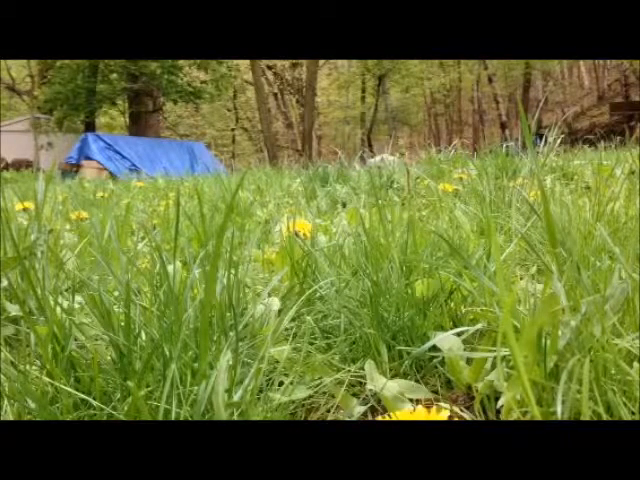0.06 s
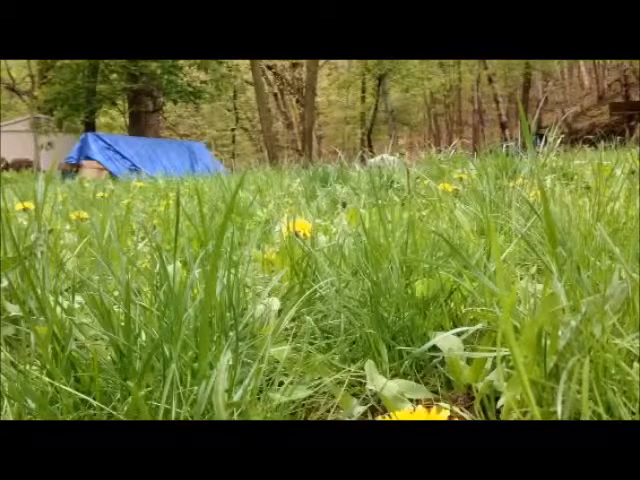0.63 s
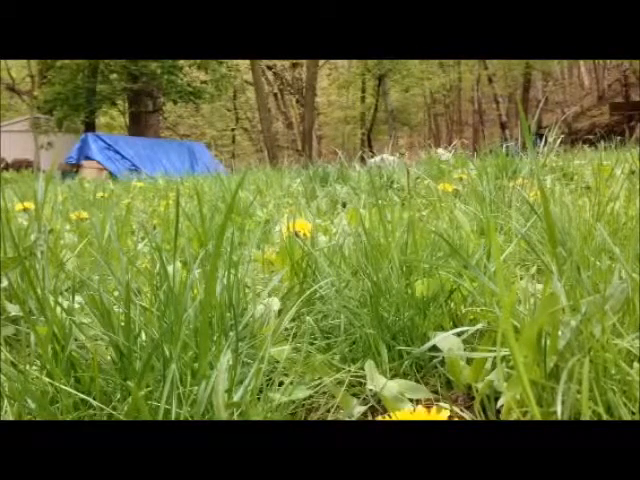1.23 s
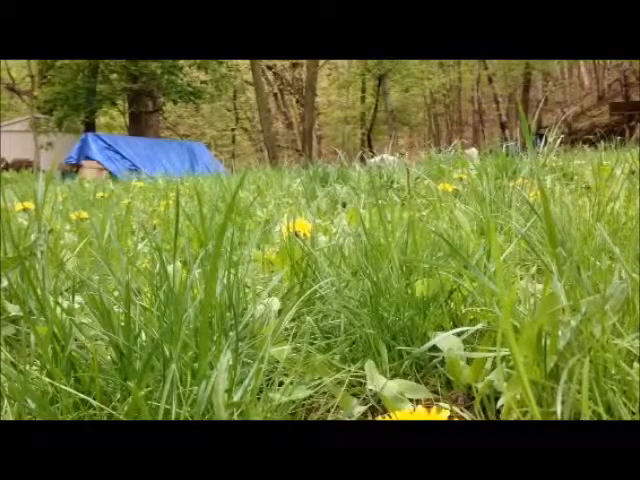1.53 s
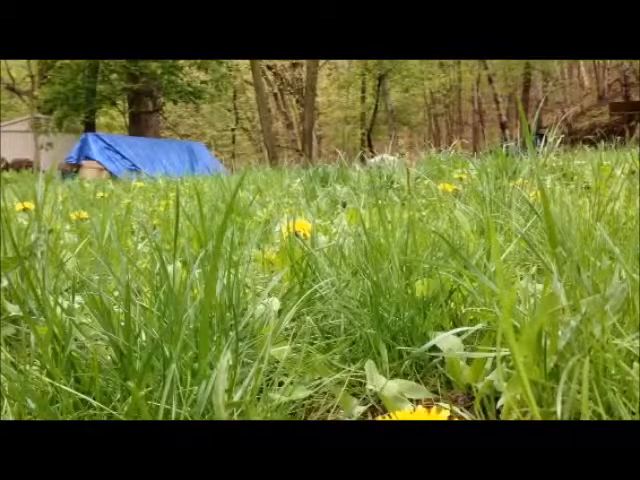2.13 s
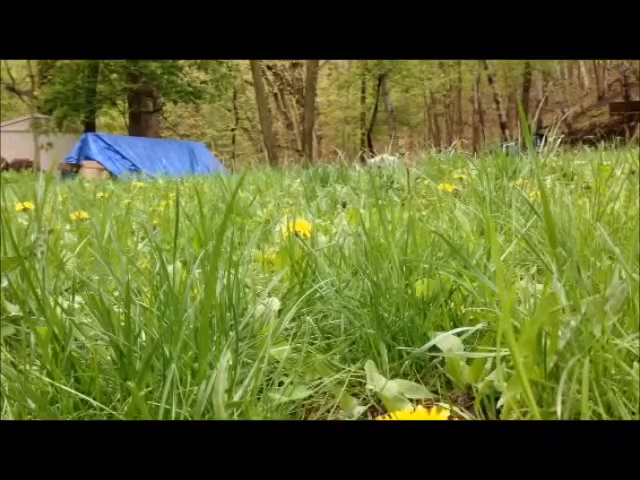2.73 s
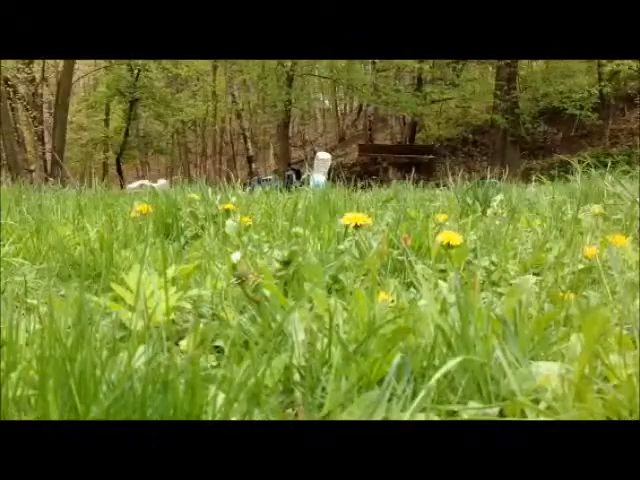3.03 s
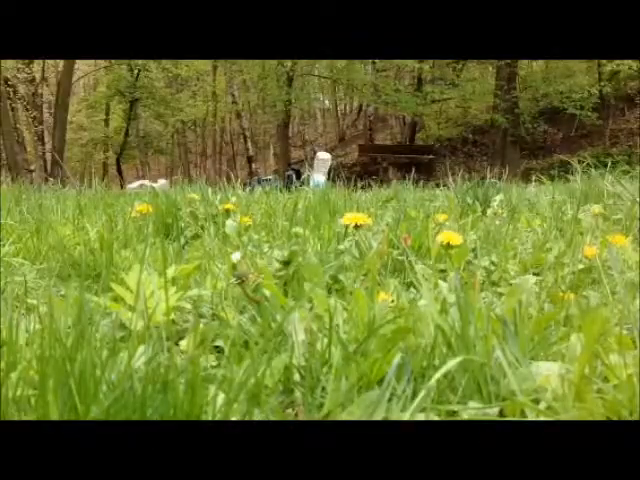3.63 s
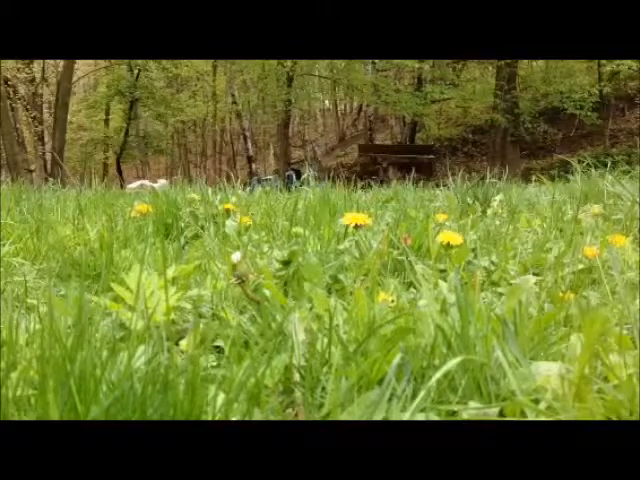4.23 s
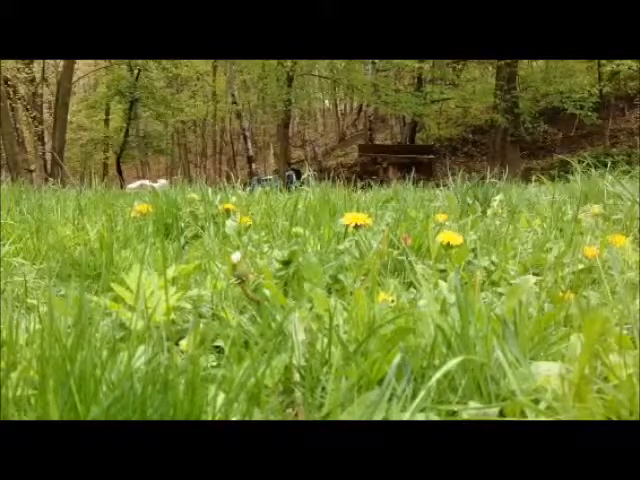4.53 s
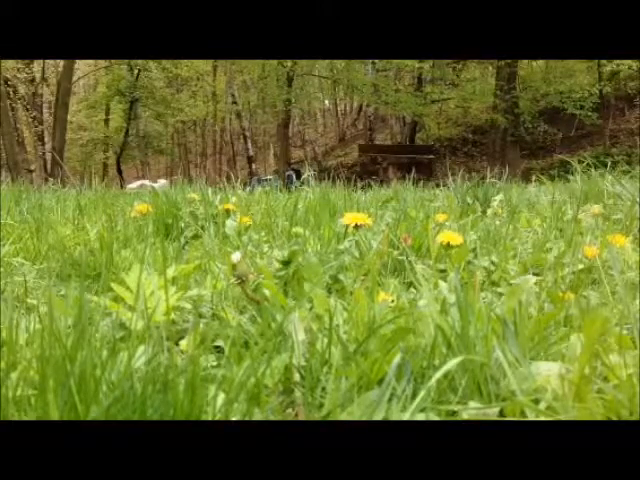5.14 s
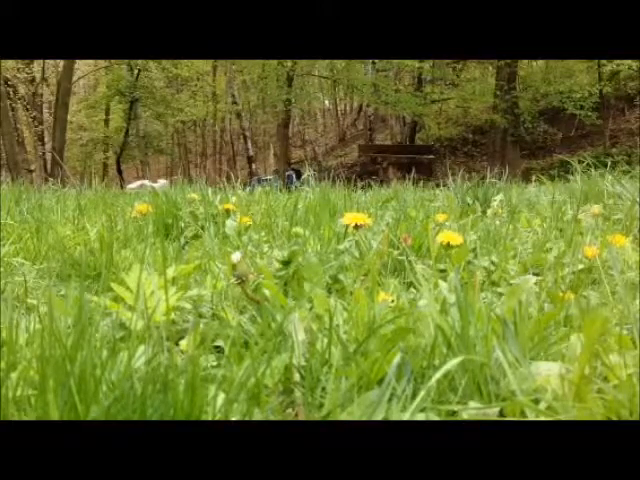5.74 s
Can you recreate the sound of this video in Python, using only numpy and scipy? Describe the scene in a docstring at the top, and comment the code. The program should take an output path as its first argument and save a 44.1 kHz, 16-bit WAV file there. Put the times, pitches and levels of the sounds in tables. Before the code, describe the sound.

One loud, sharp bang from a plastic bottle of gas breaks the quiet of a meadow, heard from low in the grass. Before it come a fading hiss, thin bird chirps, a few soft knocks and a high trill, over faint traffic and engine hum. The slightly distorted crack spreads into a bright wash, one quick echo and a long low rumble among the trees. Then the bottle drops and rattles hollowly.

```python
"""A meadow ringed by woods, microphone down in the grass. A plastic bottle of gas explodes: its shock
fronts overload the microphone, the trees scatter back a bright wash and a long low roll, and a far
wall returns one slap. Then the bottle drops to the ground and rings hollow.
Before the bang a hiss dies away and small birds chirp and trill. Things knock now and then, and far
traffic and a droning engine lie under it all."""
import sys
import numpy as np
from scipy import signal
from scipy.fft import rfft, irfft, next_fast_len
from scipy.io import wavfile
from scipy.ndimage import map_coordinates

SR = 44100
rng = np.random.default_rng(int(sys.argv[2]) if len(sys.argv) > 2 else 0)


def wav_out(sig):
    """Save sig, one row per channel (or a flat mono array), as 16-bit PCM at SR to the path in sys.argv[1]."""
    wavfile.write(sys.argv[1], SR, np.round(np.clip(np.atleast_2d(sig).T, -1, 1) * 32767).astype(np.int16))


N = 259111
T = np.arange(N) / SR
BANG_S = 4.2773


def amp(db):
    """Decibels to gain."""
    return 10 ** (np.asarray(db) / 20)


def unit(x):
    """Scale to rms 1."""
    return x / np.sqrt(np.mean(x ** 2) + 1e-20)


def along(points, hz):
    """Interpolate (f/Hz, value) points on a log frequency axis."""
    f, v = np.transpose(points)
    return np.interp(np.log(hz + 1), np.log(f + 1), v)


def wobble(rate):
    """A smooth random curve, rate knots a second."""
    return map_coordinates(rng.standard_normal(int(N * rate / SR) + 4), [T * rate])


def filtered(x, response):
    """Filter x by a complex response of frequency."""
    m = next_fast_len(N + SR // 2)
    return irfft(rfft(x, m) * response(np.fft.rfftfreq(m, 1 / SR)), m)[:N]


def low_cut(x, corner_hz, order):
    """Roll off the bass, 6 dB an octave for each order."""
    return filtered(x, lambda hz: (1j * hz / (corner_hz + 1j * hz)) ** order)


def noise(spectrum):
    """Noise of rms 1, coloured by (f/Hz, relative level/dB) points."""
    return unit(filtered(rng.standard_normal(N), lambda hz: amp(along(spectrum, hz))))


def burst(s, t60, rise=0.00058):
    """An envelope that rises at time s and dies away."""
    age = np.maximum(T - s, 0)
    return (1 - np.exp(-age / rise)) * 1000 ** (-age / t60)


def ring(modes, s):
    """Damped modes (f/Hz, level/dB, t60/s) struck at time s."""
    t = np.arange(SR // 2) / SR
    tone = sum(amp(db - 60 * t / t60) * np.sin(2 * np.pi * hz * t) for hz, db, t60 in modes)
    return np.pad(tone * (1 - np.exp(-t / 0.00061)), (int(s * SR), N))[:N]


def absorbed(x, s, db_per_s):
    """Later echoes have crossed more air: the treble tilts down for a second from s, at even power."""
    hz, t, z = signal.stft(x, SR, nperseg=256)
    gain = amp(-db_per_s * (hz[:, None] / 10400) ** 2 * np.clip(t - s, 0, 1))
    power = np.mean(np.abs(z) ** 2, axis=1, keepdims=True)
    gain /= np.sqrt(np.sum(power * gain ** 2, axis=0) / np.sum(power))
    return signal.istft(z * gain, SR, nperseg=256)[1][:N]


def blast():
    """Shock fronts, tearing and ringing plastic, and a gas ball that swings more slowly as it grows."""
    # pressure fronts of the bursting bottle: delay/s, level/dB, length/s
    fronts = [(0.0006, 9, 0.0005), (0.0024, -1.5, 0.00042)]
    # tearing plastic: f/Hz, level/dB
    rip = [(2500, -28), (5000, -11), (6400, -2), (8000, -13), (15000, -35)]
    age = np.maximum(T - BANG_S, 0)
    shock = np.zeros(N)
    for delay, db, length in fronts:
        u = np.maximum(age - delay, 0) / length
        shock += amp(db) * (1 - u) * np.exp(-u) * (1 - np.exp(-u / 0.054))
    swing_hz = 150 + 520 * np.exp(-age / 0.0039)
    swing_phase = 2 * np.pi * np.cumsum(swing_hz * (age > 0)) / SR
    swing = amp(3.5) * burst(BANG_S, 0.042, rise=0.0012) * np.sin(swing_phase)
    tear = amp(3) * burst(BANG_S + 0.0016, 0.008, rise=0.0003) * noise(rip)
    bottle_wall = ring([(875, -9, 0.03), (1376, -6, 0.022)], BANG_S)
    u = age / 0.0016  # the slow outflow of burnt gas gives the bass
    push = amp(-1.5) * (1 - u) * np.exp(-u) * (1 - np.exp(-u / 0.13))
    return shock + swing + tear + bottle_wall + push


def echoes():
    """Each belt of trees rolls the boom back and scatters the crack in its leaves; their powers add."""
    # near to far: bushes, edge of the woods, trunks behind it, trees by the far wall, hillside
    # delay/s, rise/s, boom level/dB, boom t60/s, leaf level/dB, leaf t60/s
    reflectors = [(0.013, 0.0045, -16.5, 0.336, -12, 0.74), (0.05, .004, -9.5, 0.37, -9.5, 0.28),
                  (.085, 0.018, -10, .55, -16.5, 0.64), (.232, .01, -21.5, .6, -30, .6),
                  (.33, 0.057, -33, 3.22, -47, 1.9)]
    # the low roll: f/Hz, level/dB
    roll_colour = [(30, -43.5), (70, -35), (115, -14.5), (165, -6.5), (220, 2.5), (280, 1.5), (380, 0),
                   (520, -6), (700, -9), (950, -14), (1400, -32), (3000, -50)]
    # scatter from the leaves: f/Hz, level/dB
    leaf_colour = [(60, -77), (500, -20), (1200, -6.5), (2000, -7), (3300, -1.5), (5000, 1), (7000, 2.5),
                   (10000, -3), (13000, -4.5), (15500, -11)]
    grass = burst(BANG_S, t60=0.03)  # the ground around the bottle answers first
    boom_power = (amp(-28) * grass) ** 2
    leaf_power = (amp(-11) * grass) ** 2
    for delay, rise, boom_db, boom_t60, leaf_db, leaf_t60 in reflectors:
        boom_power += (amp(boom_db) * burst(BANG_S + delay, boom_t60, rise)) ** 2
        leaf_power += (amp(leaf_db) * burst(BANG_S + delay, leaf_t60, rise)) ** 2
    roll = np.sqrt(boom_power) * amp(1.3 * wobble(40)) * noise(roll_colour)
    leaf_envelope = np.sqrt(leaf_power) * amp(0.71 * wobble(350))
    return roll + leaf_envelope * absorbed(noise(leaf_colour), 4.355, db_per_s=55)


def slap(arrival_s=4.5132):
    """A far wall returns the crack once, with a bright clank and a little boom, but no deep bass."""
    # the returned crack: f/Hz, level/dB
    colour = [(50, -45), (130, -19), (250, 3), (500, 15), (700, -8), (1000, 4), (1400, -11.5), (2000, 5),
              (3000, -9), (4500, 6.5), (5700, -6), (7200, -3), (9000, -4), (15000, -13)]
    # ring in the slap: f/Hz, level/dB, t60/s
    clank = [(1980, -26, 0.048), (4570, -18, 0.064), (7020, -16, .035)]
    crack = amp(-2) * burst(arrival_s, 0.024, rise=0.0021) * noise(colour)
    boom = amp(-8.5) * burst(arrival_s, 0.08, rise=0.0062) * np.sin(2 * np.pi * 215 * T)
    return low_cut(crack + boom, 70, order=4) + ring(clank, arrival_s + 0.00099)


def landing():
    """The empty bottle hits the ground, rings hollow and rattles to rest."""
    # ground contacts: t/s, level/dB, crunch t60/s
    hits = [(5.527, -40.5, 0.099), (5.5396, -29.5, 0.046), (5.552, -45.5, 0.082), (5.56, -46, .08)]
    # crunch of the plastic: f/Hz, level/dB
    plastic = [(50, -40), (200, -9), (400, 9.5), (600, 3), (800, -5), (1400, -8), (2000, -1), (3500, -1),
               (6000, -1.5), (9500, 0), (15000, -12)]
    # modes of the empty bottle: f/Hz, level/dB, t60/s
    shell = [(383, -3, 0.082), (557, -7, 0.14), (977, -8.5, 0.037), (1950, -15, 0.058)]
    crunch = sum(amp(db) * burst(s, t60) for s, db, t60 in hits) * noise(plastic)
    return crunch + sum(amp(db) * ring(shell, s) for s, db, _ in hits)


def knocks():
    """Hollow thuds and light clacks of things being handled on the meadow."""
    # knocks: t/s, thud level/dB, clack level/dB, clack t60/s
    hits = [(1.315, -43, -44, 0.039), (1.3258, -31.5, -53, 0.052), (1.33, -27, -51, 0.088),
            (1.672, -62, -61, .2), (1.952, -70, -55, 0.27), (2.505, -47, -56, .08),
            (5.731, -42.5, -60, 0.038), (5.79, -50, -51.5, 0.36)]
    # modes of a hollow box: f/Hz, level/dB, t60/s
    box = [(221.5, 1.5, 0.125), (326, 4.5, 0.041), (430, -1, 0.03), (575, -0.5, 0.052), (760, -12, 0.039),
           (990, -11, 0.061), (1380, -17, 0.019), (1750, -14, 0.029)]
    # the clack: f/Hz, level/dB
    clack_colour = [(50, -40), (300, -8), (600, 0), (900, 4.5), (2000, -0.5), (4000, -0.5), (7000, -8),
                    (15000, -24)]
    thuds = sum(amp(db) * ring(box, s) for s, db, _, _ in hits)
    clacks = sum(amp(db) * burst(s, t60, rise=0.0035) for s, _, db, t60 in hits) * noise(clack_colour)
    return low_cut(thuds, 90, order=4) + clacks  # a small box radiates little bass


def note(s, length, start_hz, middle_hz, end_hz, db):
    """One whistled, slightly wavering glide through three pitches."""
    u = np.linspace(0, 1, max(int(length * SR), 8))
    glide_hz = np.polyval(np.polyfit([0, 0.5, 1], [start_hz, middle_hz, end_hz], 2), u)
    waver = 1 + 0.012 * np.interp(u, np.linspace(0, 1, 24), rng.standard_normal(24))
    envelope = amp(db) * np.sqrt(np.abs(np.sin(np.pi * u)))
    tone = envelope * np.sin(2 * np.pi * np.cumsum(glide_hz * waver) / SR)
    return np.pad(tone, (max(int(s * SR), 0), N))[:N]


def chirps(arch=0.25):
    """Thin quavering notes that linger near their top pitch, and a faint low hoot that drops at its end."""
    # bird notes: t/s, length/s, start f/Hz, end f/Hz, level/dB
    calls = [(.14, 0.036, 6600, 5040, -53.5), (.364, .035, 6540, 4870, -55), (0.4, .06, 4650, 4980, -62.5),
             (.562, 0.064, 4900, 6400, -60), (.685, 0.074, 4600, 6150, -61.5),
             (.818, .057, 5100, 6200, -65), (.945, .05, 5100, 6220, -60.5), (1.452, 0.11, 7950, 8150, -67),
             (2.24, 0.075, 7800, 8250, -67), (2.42, 0.137, 3540, 3420, -68),
             (2.505, 0.053, 6700, 7260, -58.5), (2.65, 0.06, 6000, 7040, -58),
             (2.763, .037, 5900, 6720, -58)]
    hoot = note(0.072, 0.082, 476, 463, 455, db=-46.5) + note(0.151, 0.05, 416, 377, 390, db=-51)
    quaver = 1 + 0.51 * wobble(410)
    song = np.zeros(N)
    for s, length, start_hz, end_hz, db in calls:
        middle_hz = (start_hz + end_hz) / 2 + arch * abs(end_hz - start_hz)
        song += note(s, length, start_hz, middle_hz, end_hz, db)
    return song * quaver + hoot


def trill(start_s=2.883, period_s=0.0568, count=24):
    """A bird deeper in the woods repeats a clear high hook, each with a faint slide down after it."""
    hook_hz, hook_s = np.array([6700, 6850, 5600]), 0.044
    slide_hz, slide_s = (5880, 5250, 4770), 0.022
    song = np.zeros(N)
    for k, (detune, accent_db) in enumerate(rng.standard_normal((count, 2))):
        s = start_s + k * period_s + 0.00006 * k ** 2  # slowing a little
        song += note(s, hook_s, *(hook_hz + 90 * detune), db=-62.5 + accent_db)
        song += note(s + hook_s, slide_s, *slide_hz, db=-66.5 + accent_db)
    return song * unit(1 + 0.5 * wobble(650))


def woods(x):
    """The trees answer after a short gap and ring longest around 4 kHz."""
    # decay among the trees: f/Hz, t60/s
    decay = [(200, 0.504), (1000, 0.52), (4000, 1), (8000, 0.6), (15000, 0.45)]
    hz, t, z = signal.stft(rng.standard_normal(SR), SR, nperseg=256)
    envelope = amp(-60 * t / along(decay, hz)[:, None]) * (1 - np.exp(-(t / 0.037) ** 2))
    tail = signal.istft(z * envelope, SR, nperseg=256)[1]
    return signal.fftconvolve(x, tail / np.linalg.norm(tail))[:N]


def fading_hiss():
    """A bright wash dies away among the trees."""
    # the wash: f/Hz, level/dB
    colour = [(40, -45), (200, 3), (550, 3), (900, -8.5), (1600, -9.5), (2400, 1), (4000, 5),
              (6500, 1), (10000, -6.5), (15000, -19)]
    return amp(-39.5) * burst(0, 0.76, rise=0.00035) * absorbed(noise(colour), 0, db_per_s=52)


def engine():
    """A distant engine drones: a wavering tone with a weaker one a fifth above."""
    # course of the drone: t/s, f/Hz, level/dB
    drone = [(0, 185.2, -70), (.4, 185.4, -56.5), (1.3, 187, -52), (2.1, 188.7, -56), (2.7, 188, -59),
             (3.4, 182.2, -50.5), (4.2, 186.2, -57.5), (5.88, 187.3, -58.5)]
    times, hz, db = np.transpose(drone)
    phase = 2 * np.pi * np.cumsum(np.interp(T, times, hz) + 2.03 * wobble(12)) / SR
    level = amp(np.interp(T, times, db) + 2 * wobble(9))
    return level * unit(np.sin(phase) + amp(-11) * np.sin(1.5 * phase))


def traffic(step_s=2.87):
    """Far traffic and low rumble grow slowly; the background jumps louder at step_s."""
    # traffic dulled by distance: f/Hz, level/dB
    wash_colour = [(25, -53), (50, -35.5), (90, -12), (150, 2), (250, 1.5), (400, -3), (700, -7.5),
                   (1200, -18.5), (2500, -27.5), (6000, -61)]
    # low rumble: f/Hz, level/dB
    rumble_colour = [(25, -20), (50, -23), (90, 0), (140, 1.5), (400, -31.5), (2000, -73)]
    after_step = T > step_s
    wash_db = -56 + 3 * after_step + 0.53 * T + 0.77 * wobble(7.9)
    rumble_db = -81.5 + 15.5 * after_step + T  # climbs 1 dB a second
    return amp(wash_db) * noise(wash_colour) + amp(rumble_db) * noise(rumble_colour)


def air():
    """A thin, even hiss behind everything."""
    # open air: f/Hz, level/dB
    colour = [(800, 0.5), (2000, 2.5), (4000, 1), (8000, -1), (15000, -4)]
    return amp(-62.5) * noise(colour)


def scene():
    """Mono, from down in the grass; the farther a small source, the more of it comes via the trees."""
    handling, bottle, birds, far_bird = knocks(), landing(), chirps(), trill()
    direct = handling + bottle + birds + far_bird
    wet = woods(amp(-13.5) * handling + amp(-11.5) * bottle + amp(-7.5) * birds + amp(0.5) * far_bird)
    explosion = blast() + echoes() + slap()
    return (explosion + direct + wet + fading_hiss() + engine() + traffic() + air())[None]


def record(dry, top_hz=15750):
    """The microphone drops the deep bass, overloads on the bang and keeps nothing above its band limit."""
    x = low_cut(dry[0], 45, order=1)
    clipped = x / (1 + np.abs(x) ** 8) ** (1 / 8)
    return filtered(clipped, lambda hz: 1 / (1 + (hz / top_hz) ** 200))[None]


dry = scene()
out = record(dry)
wav_out(out)
```